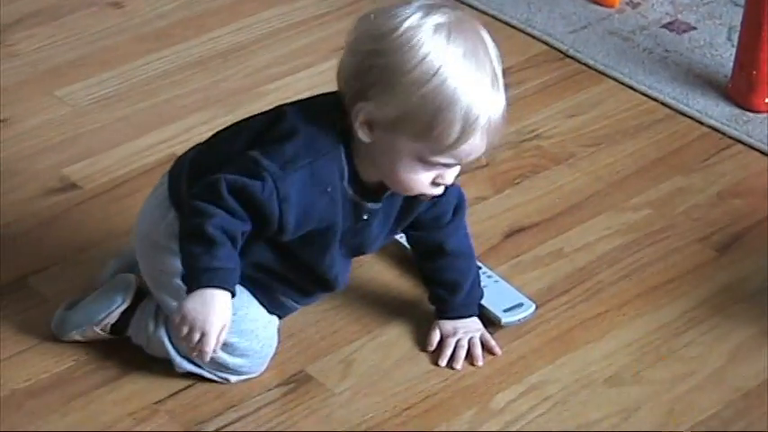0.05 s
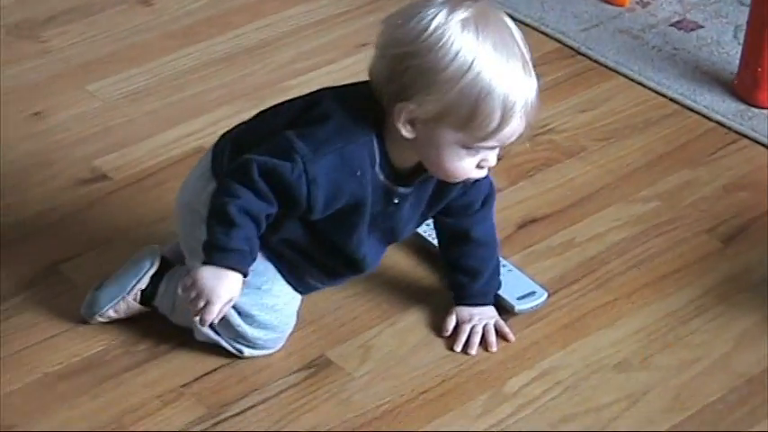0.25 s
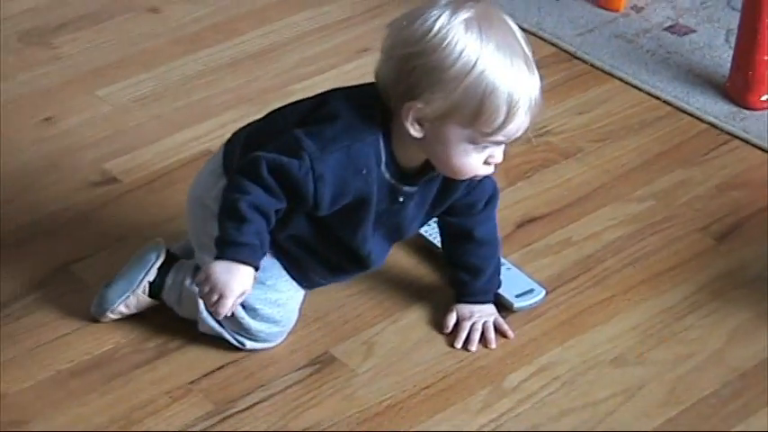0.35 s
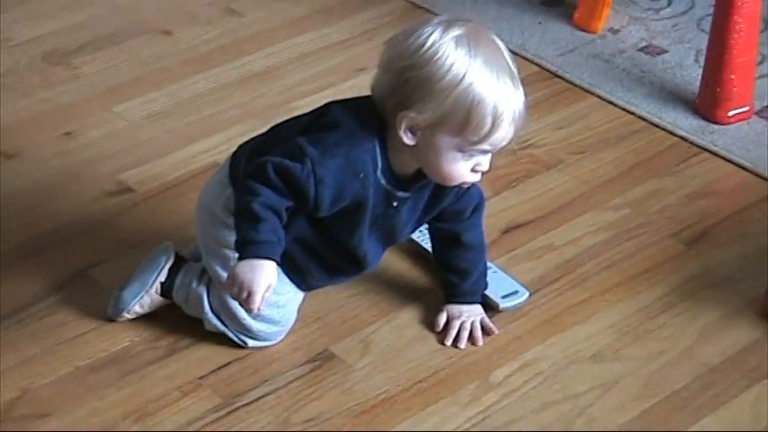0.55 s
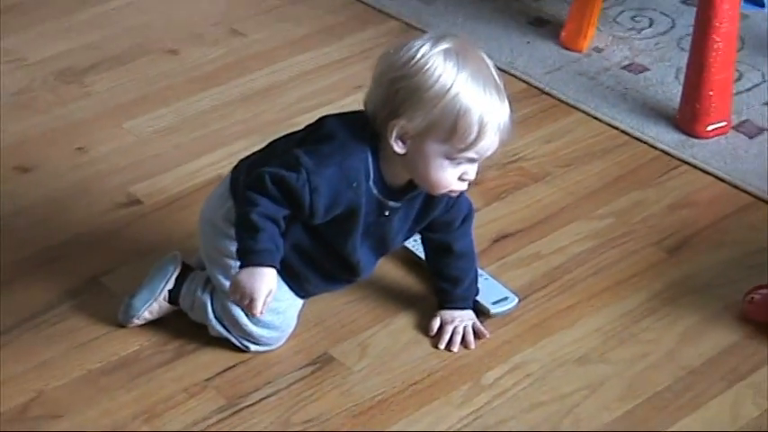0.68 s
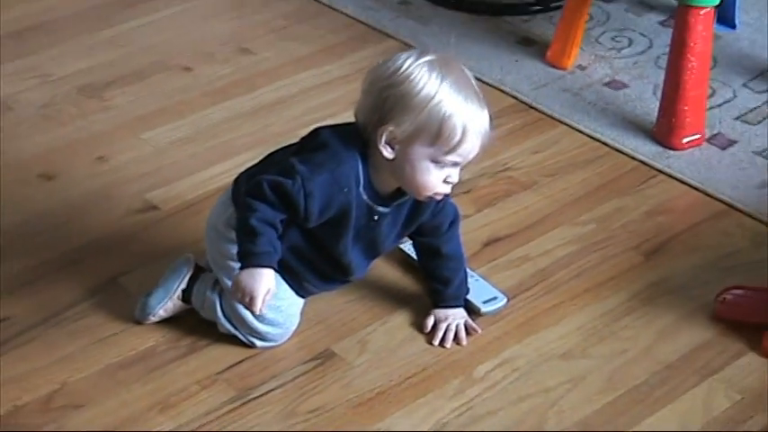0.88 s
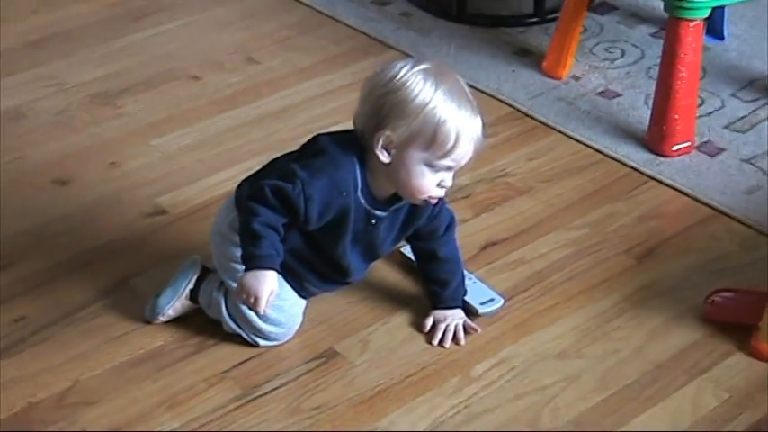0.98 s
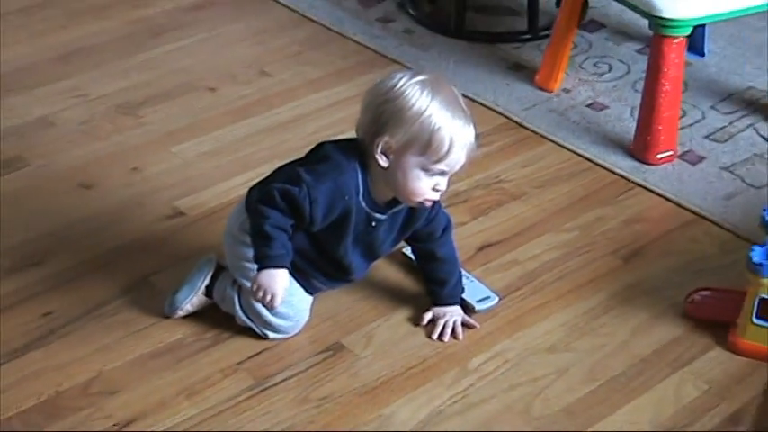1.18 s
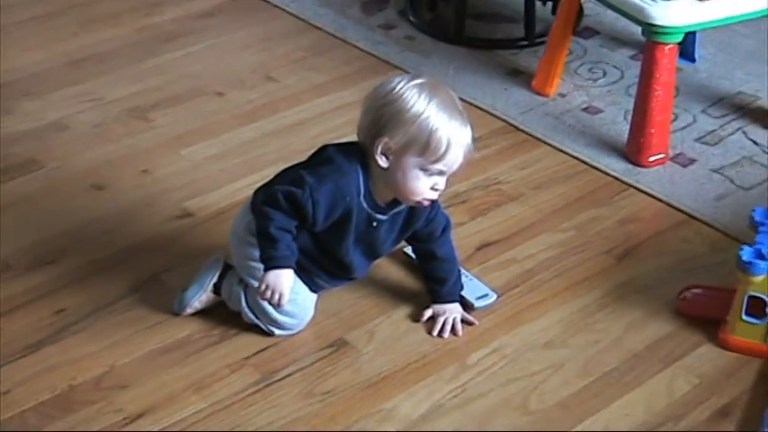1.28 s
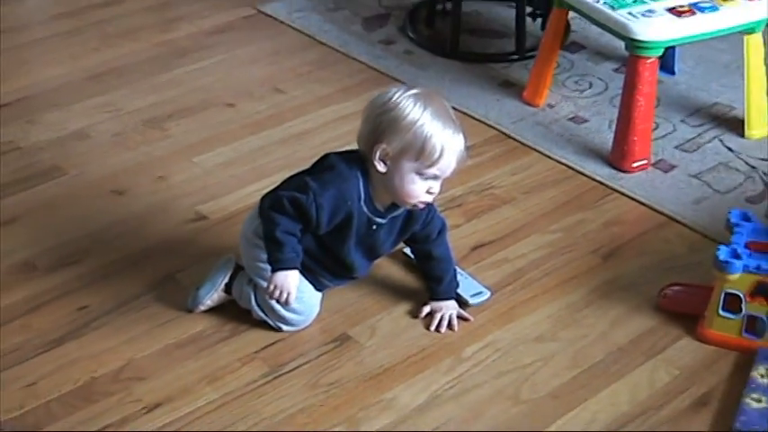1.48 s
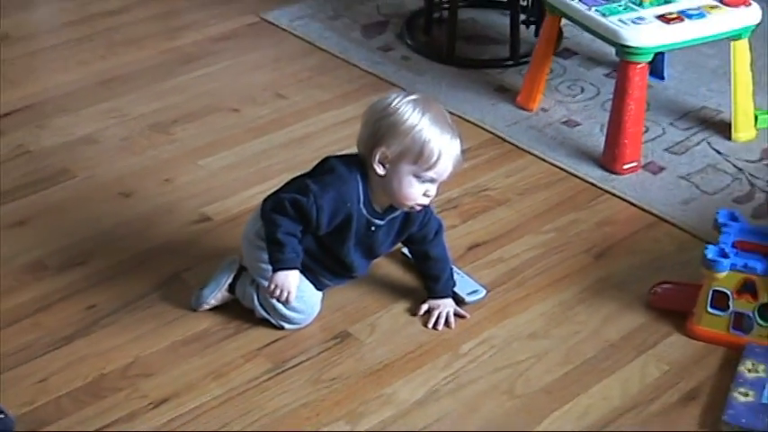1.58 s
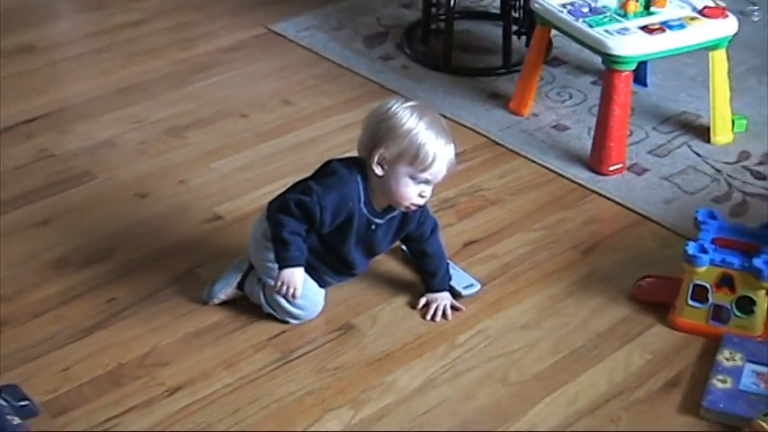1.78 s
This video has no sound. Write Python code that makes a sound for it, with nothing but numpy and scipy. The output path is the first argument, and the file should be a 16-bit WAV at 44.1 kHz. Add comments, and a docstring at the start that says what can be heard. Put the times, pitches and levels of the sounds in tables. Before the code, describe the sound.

A small hollow toy hits a wooden floor with a loud clack, then bounces in quicker, fainter knocks and chatters to rest. The microphone is close, with a short living-room echo and a low background hush.

```python
"""A small hollow toy, like a cup, clacks across a wooden living-room floor and chatters to rest.
Each landing thumps the boards, pops the air in the toy and rings its hard shell. A brief gritty hiss
comes just before the first loud clack; later an edge skids now and then. The room answers, over a low
room tone. The close stereo microphone overloads on the hardest landings and its gain control ducks."""
import sys
import numpy as np
from scipy import signal
from scipy.fft import rfft, irfft
from scipy.io import wavfile

SR = 44100
rng = np.random.default_rng(int(sys.argv[2]) if len(sys.argv) > 2 else 0)


def materialize(psi):
    """Save the field psi as 16-bit PCM at rate SR to the path in sys.argv[1].

    A 1-D psi becomes a single channel; in a 2-D psi each row is a channel.
    """
    bounded = np.clip(np.atleast_2d(psi).T, -1, 1)
    quanta = np.round(bounded * 32767).astype(np.int16)
    wavfile.write(sys.argv[1], SR, quanta)


N = 81585
T = np.arange(SR // 6) / SR  # time within one landing, s
MODE_SPREAD_DB = 2.4  # scatter of a mode's level from blow to blow


def bounce(thump_db, knock_db, clack_db, cavity_db, cavity_hz, face_db, edge_db):
    """One landing, heard through the room; thump and hollow note come mostly straight from the floor."""
    floor = amp(thump_db) * thump() + amp(knock_db) * hollow_note()
    toy = shell(face_db, edge_db) + amp(clack_db) * clack() + amp(cavity_db) * cavity(cavity_hz)
    into_room = toy + amp(knock_db) * boards() + amp(-10.5) * floor
    heard = signal.fftconvolve(into_room, room(), axes=1)
    add(heard, 0, floor[None])
    return heard


def shell(face_db, edge_db, detune=0.0046, width=0.24):
    """The hard shell rings and ticks; each mode reaches left and right with its own level and phase."""
    # shell modes: f/Hz, t60/s, level struck on the face/dB, level struck on the edge/dB
    modes = [(3306, 0.034, -29.5, -30.5), (5538, 0.026, -20.5, -32), (6595, 0.026, -48, -12.5),
             (6910, 0.017, -22, -26), (7140, 0.061, -40, -25), (7920, 0.01, -31.5, -34),
             (8665, 0.029, -26, -19), (8970, 0.021, -21, -21), (9540, .02, -30.5, -28),
             (10645, 0.018, -35, -25), (11747, 0.013, -49, -20.5), (12320, 0.015, -33, -25),
             (12220, 0.0091, -23, -30)]
    # spectrum of the tick: f/Hz, level/dB
    tick_spectrum = [(400, -42), (1500, 9.5), (3800, 4.5), (4700, -3.5), (7000, 7), (10000, 6), (13500, 4),
                     (16000, -19)]
    ringing = np.zeros((2, len(T)))
    for hz, t60, on_face_db, on_edge_db in modes:
        strength, mistune, pan, skew = rng.standard_normal(4)
        level = np.hypot(amp(face_db + on_face_db), amp(edge_db + on_edge_db))
        level *= amp(MODE_SPREAD_DB * strength)
        channels = np.exp(np.array([[1], [-1]]) * width * (.5 * pan + 1j * skew))
        cycles = hz * (1 + detune * mistune) * T + rng.random()
        ringing += level * fade(T, t60) * (channels * np.exp(2j * np.pi * cycles)).imag
    tick = colour(diffuse(len(T)), tick_spectrum) * fade(T, t60=0.0072)
    return ringing + amp(-12) * np.hypot(amp(face_db), amp(edge_db)) * tick


def clack(contact_s=.00009, band_hz=(1190, 4300)):
    """The contact pulse, which so small a body radiates without bass, and the short ring of its walls."""
    # dull, quickly damped modes of the toy's walls: f/Hz, t60/s, level/dB
    wall_modes = [(1890, 0.014, -12), (2110, 0.01, -11), (2191, 0.0088, -10.5), (2440, 0.0035, -7),
                  (2680, 0.0081, -11), (3290, 0.0066, -19.5), (3480, 0.0058, -22.5), (4130, 0.002, -30)]
    band = signal.butter(2, band_hz, "bandpass", fs=SR, output="sos")
    contact = signal.sosfilt(band, pulse(T, contact_s))
    return ring(wall_modes, detune=0.04) + amp(2) * contact


def cavity(pitch_hz, sag=0.01, sag_s=0.018):
    """The air in the toy pops, slightly flat while its opening is close to the floor."""
    hz = pitch_hz * (1 - sag * np.exp(-T / sag_s))
    return amp(-5) * fade(T, t60=0.025) * np.sin(2 * np.pi * np.cumsum(hz) / SR)


def thump(start_hz=381, end_hz=140.3, glide_s=0.0466):
    """A bending wave in the floor: its lower tones arrive later."""
    hz = end_hz + (start_hz - end_hz) * np.exp(-T / glide_s)
    return amp(-25.5) * pulse(T, rise_s=0.013) * np.sin(2 * np.pi * np.cumsum(hz) / SR)


def boards():
    """The floorboards knock under the blow."""
    # floorboard modes: f/Hz, t60/s, level/dB
    board_modes = [(295, 0.087, -37), (445, 0.078, -53.5), (566, 0.026, -32), (664, 0.037, -28),
                   (780, 0.057, -20.5), (958, 0.028, -26), (1050, 0.029, -29), (1240, 0.034, -27)]
    return ring(board_modes, detune=0.0077)


def hollow_note(hz=948, delay_s=0.007213):
    """A short hollow note that the floor gives a moment after the blow."""
    t = np.maximum(T - delay_s, 0)
    return amp(-13.5) * pulse(t, rise_s=0.0018) * np.sin(2 * np.pi * hz * t)


def gritty_hiss(length_s, level_db, clicks_per_s=2100):
    """A brief gritty hiss: a burst of tiny clicks with the shell's ring, heard through the room."""
    clicking = (rng.random(len(T)) < clicks_per_s / SR) | (T == 0)
    clicks = rng.choice([-1., 1.], len(T)) * clicking * (T < length_s)
    clicks /= np.linalg.norm(clicks) + 1e-9
    shell_ring = shell(face_db=level_db - 3, edge_db=level_db)
    rasp = signal.fftconvolve(shell_ring, clicks[None], axes=1)[:, :len(T)]
    grit = amp(level_db - 4) * np.diff(clicks, prepend=0)
    return signal.fftconvolve(rasp + grit, room(), axes=1)


def room(tail_delay_s=0.003, build_s=0.0014, early_db=1.5, early_s=0.06):
    """Landing spot to microphone: direct sound, near reflections, then a tail that dies band by band."""
    # near reflections: delay/s, gain
    echoes = [(.0012, 0.12), (.0025, 0.54), (.0037, 0.23), (.0092, .25), (.0136, 0.15)]
    # decay time of the living room: f/Hz, t60/s
    decay = [(150, 1), (400, 0.65), (1200, 0.45), (2800, 0.48), (7000, 0.41), (14000, 0.3)]
    # spectrum of the tail: f/Hz, level/dB
    tail_spectrum = [(60, -24.5), (170, 4), (400, 4), (1200, 4.5), (2800, -1), (3800, 1), (4700, -4),
                     (5600, 0), (9000, -2), (14000, -2)]
    t = np.arange(3 * SR // 4) / SR
    hz, when, bands = signal.stft(diffuse(len(t)), SR, nperseg=512)
    bands = bands * amp(read(tail_spectrum, hz))[:, None] * fade(when, read(decay, hz)[:, None])
    tail = signal.istft(bands, SR)[1][:, :len(t)] / np.linalg.norm(fade(t, t60=0.36))
    swell = np.clip((t - tail_delay_s) / build_s, 0, 1) * amp(early_db * np.exp(-t / early_s))
    path = amp(-5.5) * swell * tail
    path[:, 0] += 1  # direct sound
    for delay, gain in echoes:
        path[:, round(delay * SR)] += gain
    return path


def room_tone(rms_db=-43):
    """The steady low noise of the living room."""
    # room tone spectrum: f/Hz, level/dB
    spectrum = [(25, -6.5), (60, -10), (90, -4.5), (150, 5), (300, 4.5), (700, -2), (1500, -10.5),
                (4000, -21), (15000, -34.5)]
    tone = colour(diffuse(N), spectrum)
    return amp(rms_db) * tone / tone.std()


def diffuse(size):
    """Noise from all sides: left and right are alike in the bass, apart in the treble."""
    # stereo width: f/Hz, side level against mid/dB
    side_spectrum = [(100, -22.5), (500, -22.5), (2000, -21.5), (5000, -10), (9000, -5), (15000, -1)]
    mid, side = rng.standard_normal((2, size))
    side = colour(side, side_spectrum)
    return np.array([mid + side, mid - side])


def ring(modes, detune):
    """Struck modes, a little different in level and pitch at every blow."""
    ringing = np.zeros(len(T))
    for hz, t60, db in modes:
        strength, mistune = rng.standard_normal(2)
        envelope = amp(db + MODE_SPREAD_DB * strength) * fade(T, t60)
        ringing += envelope * np.sin(2 * np.pi * hz * (1 + detune * mistune) * T)
    return ringing


def pulse(t, rise_s):
    """Rises to 1 at rise_s, then dies away."""
    return t / rise_s * np.exp(1 - t / rise_s)


def fade(t, t60):
    """Exponential decay, 60 dB down at t60."""
    return np.exp(-np.log(1000) * t / t60)


def amp(db):
    """Decibels to gain."""
    return 10 ** (np.asarray(db) / 20)


def read(points, hz):
    """Interpolates a curve over log frequency."""
    f, value = np.transpose(points)
    return np.interp(np.log(hz + 1), np.log(f), value)


def colour(x, spectrum):
    """Filters by a spectrum of points: f/Hz, level/dB."""
    n = x.shape[-1]
    gain = amp(read(spectrum, np.fft.rfftfreq(2 * n, 1 / SR)))
    return irfft(rfft(x, 2 * n) * gain)[..., :n]


def add(mix, s, sound):
    """Lays a sound into the stereo mix at time s."""
    part = mix[:, round(s * SR):][:, :sound.shape[1]]
    part += sound[:, :part.shape[1]]


def scene(lead_s=.25, low_cut_hz=192):
    """Bounces and grit, thin in the bass, over room tone; the first bounce is already dying away."""
    # landings, with a gain for each part: t/s, floor thump/dB, board knock/dB,
    # clack/dB, cavity/dB, cavity f/Hz, shell face/dB, shell edge/dB
    landings = [ (-.06, 2.5, -10, -7, -6, 1504, -5, -13), (0.2084, 3, -3, 8, 7, 1565, 12, 5.5),
                (0.3703, -6, -22, 3.5, 11, 1333, 1.5, -4.5), (0.548, 2, -5, -10, -11, 1270, -5, -5.5),
                (.5600, -7, -7.5, -5.5, -15, 1500, 0, -0.5), (0.7333, -2.5, -3, -4, 1, 1562, 3.5, -21),
                (0.7638, -12, -20, -19, -17, 1490, -9.5, -9.5), (0.8789, -6.5, -31, 1.5, 2.5, 1554, 1, -23),
                (0.9657, -17, -0.5, -37, -20, 1550, -3, -6), (1.0049, -13, -3, -4, -9.5, 1594, -1, -32),
                (1.1055, -13, 2, -12, -8.5, 1530, -5, -8), (1.1924, -13.5, -29, -6, -20, 1620, -1.5, -18),
                (1.2465, -31, -25, -29, -39, 1590, -27, -11), (1.2595, -18, -4.5, -9.5, -32, 1530, -13, 0),
                (1.3206, -23, -19, -39, -36, 1640, -15, -21), (1.3471, -21, -7.5, -15, -27, 1530, -15, 1),
                (1.4195, -24, -7.5, -14.5, -40, 1530, -8, -1.5),
                (1.4595, -23, -9.5, -19, -36, 1620, -10, -10),
                (1.5020, -17, -11.5, -17, -23, 1590, -5, -9.5),
                (1.5509, -17, -8.5, -16.5, -33, 1600, -8.5, -8),
                (1.6015, -14.5, -11, -45, -34, 1690, -18, -16.5),
                (1.6293, -35, -10, -25, -33, 1560, -10, -15)]
    # brief gritty hisses, one just before the first loud clack, the later ones where an edge skids:
    # t/s, length/s, level/dB
    hisses = [(0.2058, 0.0047, -4.5), (0.546, 0.003, -2.5), (0.559, 0.0024, -1.5), (0.763, 0.0038, -8.5),
              (0.961, 0.014, -6.5), (1.111, 0.0042, -7.5), (1.247, 0.0037, -14.5)]
    mix = np.zeros((2, N + round(lead_s * SR)))
    for s, *blow in landings:
        add(mix, s + lead_s, bounce(*blow))
    for s, length_s, level_db in hisses:
        add(mix, s + lead_s, gritty_hiss(length_s, level_db))
    low_cut = signal.butter(3, low_cut_hz, "highpass", fs=SR, output="sos")
    return signal.sosfilt(low_cut, mix)[:, -N:] + room_tone()


def record(dry):
    """The close microphone: gain control ducks after loud hits, first peaks clip, the top is cut off."""
    threshold_db, duck_share, attack_s, recover_db_per_s = -12.5, 0.32, 0.0023, 38
    pole = np.exp(-1 / (attack_s * SR))
    power = signal.lfilter([1 - pole], [1, -pole], (dry ** 2).mean(0))
    power_db = 10 * np.log10(power + 1e-12)
    fall_db = np.arange(N) * recover_db_per_s / SR
    held_db = np.maximum.accumulate(power_db + fall_db) - fall_db  # jumps to each peak, then sinks
    duck_db = duck_share * np.maximum(held_db - threshold_db, 0)
    clipped = np.clip(dry * amp(-duck_db), -1, 1)
    band_limit = signal.firwin(301, cutoff=15900, window=("kaiser", 8), fs=SR)
    return signal.oaconvolve(clipped, band_limit[None], "same")


dry = scene()
out = record(dry)
materialize(out)
```